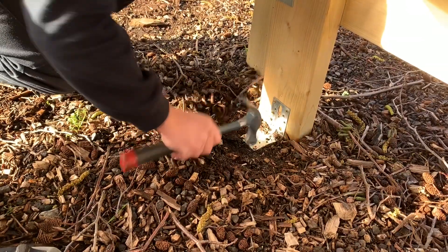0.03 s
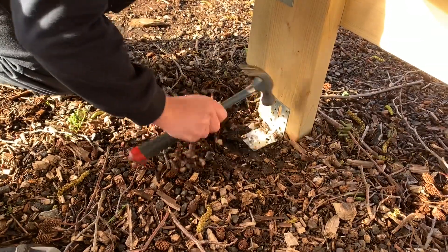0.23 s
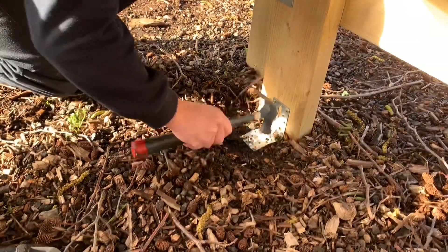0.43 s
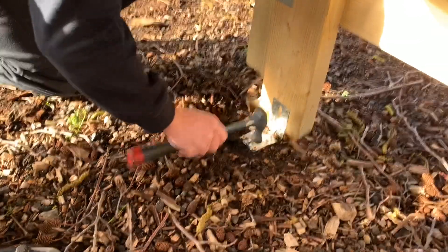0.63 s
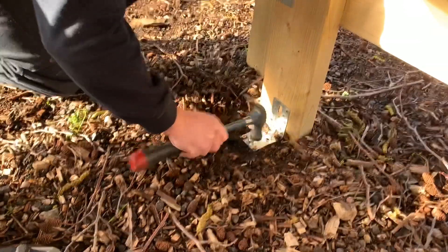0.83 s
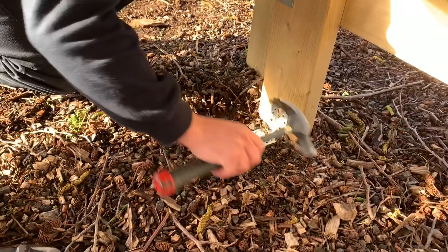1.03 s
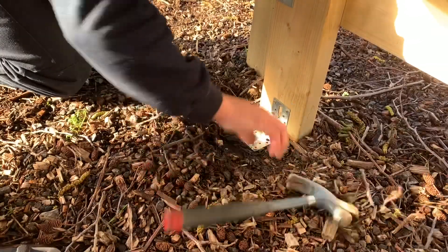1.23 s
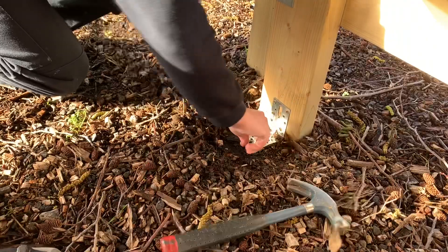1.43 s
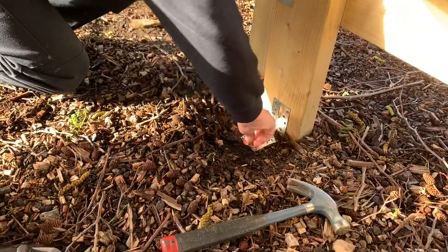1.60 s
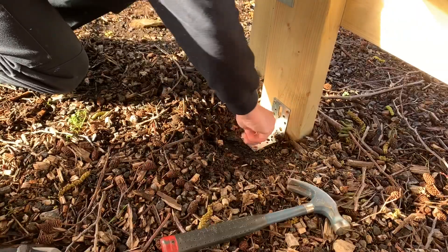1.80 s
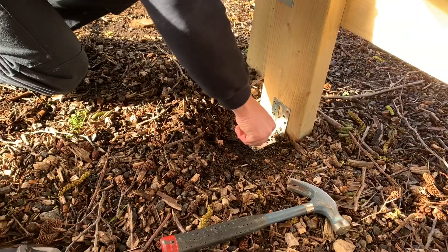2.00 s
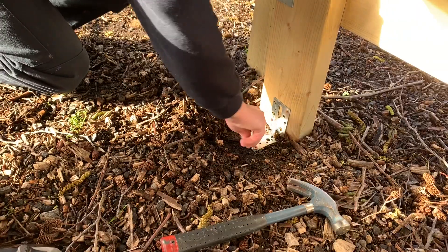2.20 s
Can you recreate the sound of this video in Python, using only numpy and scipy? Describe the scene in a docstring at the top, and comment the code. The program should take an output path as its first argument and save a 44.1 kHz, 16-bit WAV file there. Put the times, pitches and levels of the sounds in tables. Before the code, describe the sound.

A hammer taps a bolt into a steel bracket on a wooden post, four quick clanks with dull thuds beneath. It is then laid on crunching bark mulch, and faint finger clicks follow, close by in quiet outdoor air.

```python
"""Over a low, steady outdoor background, a claw hammer taps a bolt into a steel bracket on a wooden post:
four blows, each with a rebound. Every impact excites damped modes, so the clamped steel clanks briefly
while a bending wave makes the post thud under it. Just after one second the hammer is laid on bark mulch,
which crunches as the head thumps and rings. Last, fingers tick at the bolt and sleeve and knee shuffle."""
import sys
import numpy as np
from scipy import signal
from scipy.fft import rfft, irfft, next_fast_len
from scipy.io import wavfile

SR = 44100
rng = np.random.default_rng(int(sys.argv[2]) if len(sys.argv) > 2 else 0)


def wav_record(signal):
    """Record a signal, one row per channel, as 16-bit PCM in the file named by sys.argv[1]."""
    frames = np.transpose(np.atleast_2d(signal))
    bounded = np.clip(frames, -1, 1)
    # unit amplitude maps onto the largest positive 16-bit level
    quanta = np.round(bounded * 32767).astype(np.int16)
    wavfile.write(sys.argv[1], SR, quanta)


N = 99269
T = np.arange(N) / SR
ONSET_CYCLES = 0.97  # a mode starts about one period late, so low modes enter last

# Hammer contacts, blow and rebound in turn. Each row: start in seconds, then strength in dB at six
# frequencies from low to high.
CONTACTS = [(0.0, -4.5, 4.5, -2.5, -2, 1.5, 2), (0.0469, -3.5, -4.5, -9, -3.5, -1, 1.5),
            (0.2709, 6, 3.5, -3, -1, 0.5, 2.5), (0.2998, -23.5, -20, -15, -15.5, -17, -10),
            (0.5335, 4, -3.5, -3, -2, -0.5, 1.5), (0.5759, -15, -12, -8, -10.5, -11, -7.5),
            (0.7606, 5.5, -4.5, 3.5, -0.5, -0.5, -2), (0.8145, -19, -14.5, -15, -15.5, -6.5, -8.5)]


def amp(db):
    """Decibels to amplitude ratio."""
    return 10 ** (np.asarray(db) / 20)


def at_hz(table, hz, column=1):
    """Interpolation of a table's column on a logarithmic frequency axis."""
    table = np.array(table, float)
    return np.interp(np.log(hz), np.log(table[:, 0]), table[:, column])


def burst(start, rise, t60):
    """Exponential build-up and decay; the decay loses 60 dB in t60 seconds."""
    age = np.maximum(T - start, 0)
    return (1 - np.exp(-age / max(rise, 1e-5))) * np.exp(-np.minimum(np.log(1000) * age / t60, 60))


def flicker(step_s):
    """Random modulation: straight lines between Gaussian values one step apart."""
    return np.interp(T / step_s, np.arange(N), rng.standard_normal(N))


def noise_bands():
    """Partial coherence between two channels: yields (Hz, stereo noise of rms 1) for each half octave."""
    # Stereo field. Each row: frequency in Hz, correlation of left and right, delay of the left in ms.
    coherence = [(60, .5, 0), (170, .9, 0), (400, .8, .1), (900, .7, .25), (1600, .7, .22), (3000, .1, .22),
                 (6000, 0, .225), (9000, -.9, .225), (15000, -.9, .225)]
    edges = 25 * 2 ** np.arange(0, 9.6, .5)
    size = next_fast_len(N)
    f = np.fft.rfftfreq(size, 1 / SR)
    white = rfft(rng.standard_normal((2, size)))
    for low, high in zip(edges, edges[1:]):
        hz = np.sqrt(low * high)
        mid, side = white * ((f >= low) & (f < high))
        correlation = at_hz(coherence, hz)
        mid, side = mid * np.sqrt(1 + correlation), side * np.sqrt(1 - correlation)
        delay = np.exp(-2j * np.pi * f * at_hz(coherence, hz, column=2) / 1000)
        band = irfft([(mid + side) * delay, mid - side], size)[:, :N]
        yield hz, band / band.std()


def rustle(events, spectrum, grain_db):
    """Amplitude modulation: a fast random level breaks bursts of noise into crackling grains."""
    envelope = sum(amp(db) * burst(start, rise, t60) for start, db, rise, t60 in events)
    grains = amp(grain_db * flicker(step_s=.0006))
    return envelope * grains * sum(amp(at_hz(spectrum, hz)) * noise for hz, noise in noise_bands())


def excitation(contact_db, hz):
    """An impact drives each frequency in proportion to its force spectrum; returns that gain."""
    # The frequencies in Hz at which a contact's six strengths apply.
    contact_hz = [130, 400, 900, 1600, 4500, 12000]
    return amp(np.interp(np.log(hz), np.log(contact_hz), contact_db))


def outdoor_background():
    """Ambient noise: distant rumble and soft hiss, each band wavering independently."""
    # Spectrum of the open air. Each row: frequency in Hz, level in dB per half octave.
    air = [(30, -72), (45, -52.5), (70, -50.5), (120, -59), (200, -55.5), (280, -61.5), (400, -63.5),
           (600, -67), (1000, -64.5), (1700, -64), (3000, -64.5), (5000, -68.5), (6800, -74.5), (7700, -85),
           (8700, -87), (15000, -84.5)]
    wavering = sum(amp(1.5 * flicker(step_s=0.048)) * noise for hz, noise in noise_bands())
    size = next_fast_len(N)
    hz = np.maximum(np.fft.rfftfreq(size, 1 / SR), 1)
    return irfft(rfft(wavering, size) * amp(at_hz(air, hz)), size)[:, :N]


def cloth_shuffles():
    """Friction of sleeve and knee makes soft, grainy noise."""
    # Movements. Each row: start in seconds, level in dB, rise in seconds, t60 in seconds.
    shuffles = [(1.422, -57, .002, 0.03), (1.615, -62, .015, 0.13), (1.648, -57, 0.022, 0.13),
                (1.76, -56, .015, 0.12), (1.85, -55.5, 0.0011, 0.049), (2.055, -60, .008, 0.1)]
    # Spectrum of the rubbing. Each row: frequency in Hz, relative level in dB per half octave.
    spectrum = [(70, 2.5), (200, -16), (500, -4), (1400, 8.5), (3000, -13.5), (8000, -26.5), (15000, -11)]
    return rustle(shuffles, spectrum, grain_db=5.5)


def finger_ticks():
    """Brief contacts have broad spectra: handling the tool and the bolt gives faint, dry clicks."""
    # Touches. Each row: start in seconds, level in dB, tilt about 4 kHz in dB per octave.
    touches = [(0.438, -64.5, 0.5), (1.3345, -48.5, -0.5), (1.343, -55, 0), (1.422, -60.5, 7),
               (1.477, -67, 2.5), (1.848, -58.5, -1.5), (2.06, -62.5, -4), (2.158, -79, 4)]
    # Spectrum of a click. Each row: frequency in Hz, relative level in dB per half octave.
    spectrum = [(300, -11), (1400, 5), (3000, 2.5), (6000, 0.5), (11000, 0), (15000, -0.5)]
    out = np.zeros((2, N))
    for hz, noise in noise_bands():
        for start, db, tilt in touches:
            gain = amp(db + at_hz(spectrum, hz) + tilt * np.log2(hz / 4000))
            out += gain * burst(start, rise=0.00082, t60=0.016) * noise
    return out


def mulch_crunch():
    """Granular noise: bark gives way under the hammer in many tiny contacts."""
    # Crunches. Each row: start in seconds, level in dB, rise in seconds, t60 in seconds.
    crunches = [(1.1437, -40.5, 0.00013, 0.031), (1.150, -45, 0.004, 0.08), (1.2422, -32, 0.0028, 0.046)]
    # Spectrum of the bark. Each row: frequency in Hz, relative level in dB per half octave.
    spectrum = [(200, -19.5), (600, -16.5), (1000, 0), (1500, 1), (2300, -0.5), (3600, 0), (7000, -6),
                (11000, 0), (15000, -3.5)]
    return rustle(crunches, spectrum, grain_db=2)


def hammer_head():
    """Damped free vibration: the head thumps on the ground and rings briefly."""
    # Modes of the landing. Each row: frequency in Hz, level in dB, t60 in seconds.
    modes = [(76.4, -25, 0.12), (1130, -40, 0.059), (1423, -28, 0.048), (1676, -29, 0.033),
             (7950, -53, 0.039), (11100, -38, .035), (14400, -49, .03)]
    lands_s = 1.2435
    out = np.zeros(N)
    for hz, db, t60 in modes:
        envelope = burst(lands_s + ONSET_CYCLES / hz, rise=0.0032, t60=t60)
        out += amp(db) * envelope * np.sin(2 * np.pi * hz * (T - lands_s))
    return out


def post_thud():
    """Dispersion: a bending wave's high frequencies travel fastest, so the post's thud sweeps down."""
    start_hz, end_hz, fall_s = 468, 99.5, 0.00582
    delay_s, peak_s, tail_t60_s = 0.003513, 0.01, 0.037
    left_lag = np.array([[.5], [0]])  # radians
    out = np.zeros((2, N))
    for start, *contact_db in CONTACTS:
        age = np.maximum(T - start - delay_s, 0)
        hz = end_hz + (start_hz - end_hz) * np.exp(-age / fall_s)
        phase = 2 * np.pi * np.cumsum(hz * (age > 0)) / SR
        swell = (age / peak_s * np.exp(1 - age / peak_s)) ** (np.log(1000) * peak_s / tail_t60_s)
        out += excitation(contact_db, hz) * swell * np.sin(phase - left_lag)
    return amp(-16) * out


def steel_clank():
    """Modal overlap: the steel's crowded modes merge into noise, which the surroundings scatter faintly."""
    # Direct sound. Each row: frequency in Hz, relative level in dB per half octave, t60 in seconds.
    steel = [(304.5, -28.5, 0.11), (556, -28.5, 0.03), (900, -14.5, 0.049), (1500, -14.5, 0.044),
             (2300, -22.5, 0.034), (4500, -23.5, 0.064), (6940, -33, 0.047), (11670, -21.5, 0.027),
             (15000, -27, .02)]
    # Scatter from the surroundings, with the same columns.
    scatter = [(60, -35.5, 0.2834), (177, -38.5, 0.38), (400, -40.5, 0.256), (1200, -38.5, 0.15),
               (4130, -45.5, 0.14), (11020, -54.5, 0.16), (15000, -69.5, 0.22)]
    out = np.zeros((2, N))
    for hz, noise in noise_bands():
        # Both spectra fall 12 dB per octave below their first row.
        direct_gain = amp(at_hz(steel, hz)) * min(1, hz / steel[0][0]) ** 2
        scatter_gain = amp(at_hz(scatter, hz)) * min(1, hz / scatter[0][0]) ** 2
        crack_gain = amp(-0.5) * min(1, hz / 1435)  # the first instant of contact is bright
        for start, *contact_db in CONTACTS:
            crack = crack_gain * burst(start, rise=0, t60=0.0055)
            ring = burst(start, rise=0.86 / hz, t60=at_hz(steel, hz, column=2))
            tail = burst(start, rise=.008, t60=at_hz(scatter, hz, column=2))
            envelope = np.hypot(direct_gain * (crack + ring), scatter_gain * tail)  # powers add
            out += excitation(contact_db, hz) * envelope * noise
    return out


def bracket_modes():
    """Modal superposition: each contact sets post, bracket and bolt ringing as a sum of damped sines."""
    # Joint modes. Each row: frequency in Hz, relative level in dB, t60 in seconds, left lag in radians.
    modes = [(61.4, -21, .13, -1.8), (134.5, -22.5, 0.037, 0.55), (164.7, -18.5, 0.11, 0),
             (208, -16, .13, 0.44), (282, -22.5, .09, 0.06), (359, -18, .06, 1.3),
             (410.5, -11.5, 0.06, 0.67), (605, -13, .05, 4), (779.3, -16, 0.0537, 1),
             (890, -18.5, 0.047, 1.9), (985, -19, 0.049, 2.9), (1120, -20, .04, 6.5),
             (1229, -13.5, 0.074, 1.77), (1321, -18, 0.054, -1), (1602, -9, 0.048, 2),
             (1840, -24, 0.031, 3.0), (1900, -26.5, 0.023, -3.5), (2003, -20, .045, -0.74),
             (2842, -27, .045, 0.5), (3490, -30.5, 0.056, -2.5), (3890, -27.5, .04, -1.5),
             (4010, -28, 0.041, 2), (4070, -30.5, .04, 3), (4810, -30.5, 0.039, 1.5),
             (5230, -20.5, 0.031, -2), (6803, -27.5, 0.046, 2)]
    out = np.zeros((2, N))
    for contact_s, *contact_db in CONTACTS:
        for k, (hz, db, t60, lag) in enumerate(modes):
            start = contact_s + ONSET_CYCLES / hz
            spread_db = 3.08 + 0.43 * hz / 1000  # high modes depend more on where the hammer lands
            gain = (-1) ** k * excitation(contact_db, hz) * amp(db + spread_db * rng.standard_normal())
            phase = 2 * np.pi * hz * (T - start) - np.array([[lag], [0]])
            out += gain * burst(start, rise=1.23 / hz, t60=t60) * np.sin(phase)
    return out


def scene():
    """Linear superposition of the blows, the hammer laid down, the handling and the open air."""
    blows = bracket_modes() + post_thud() + steel_clank()
    laid_down = mulch_crunch() + hammer_head()
    handling = finger_ticks() + cloth_shuffles()
    return blows + laid_down + handling + outdoor_background()


def record(dry):
    """Band limiting and soft saturation: deep rumble is cut, peaks are rounded, the top is removed."""
    ceiling = 1.69
    high_pass = signal.butter(2, 42, "high", fs=SR, output="sos")
    low_pass = signal.cheby2(14, 70, 17100, fs=SR, output="sos")
    rounded = ceiling * np.tanh(signal.sosfilt(high_pass, dry) / ceiling)
    return signal.sosfilt(low_pass, rounded)


dry = scene()
out = record(dry)
wav_record(out)
```